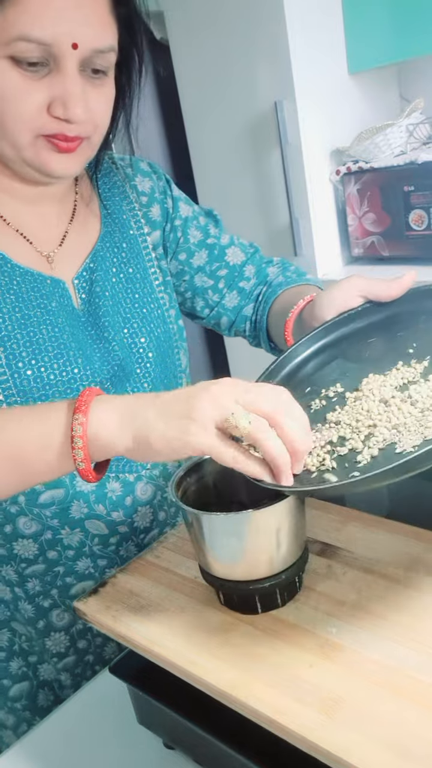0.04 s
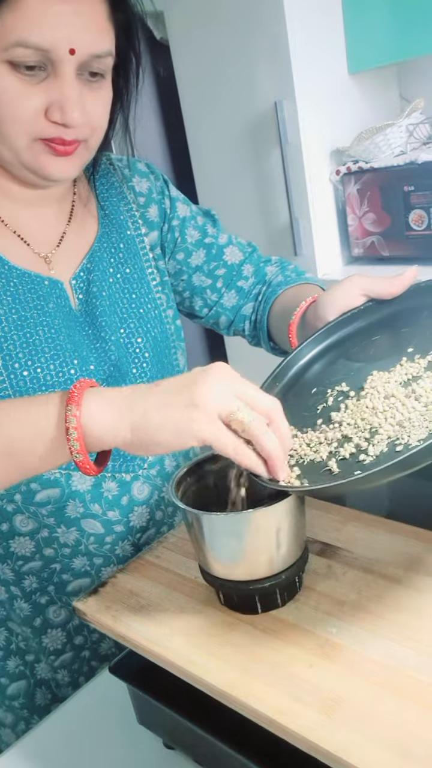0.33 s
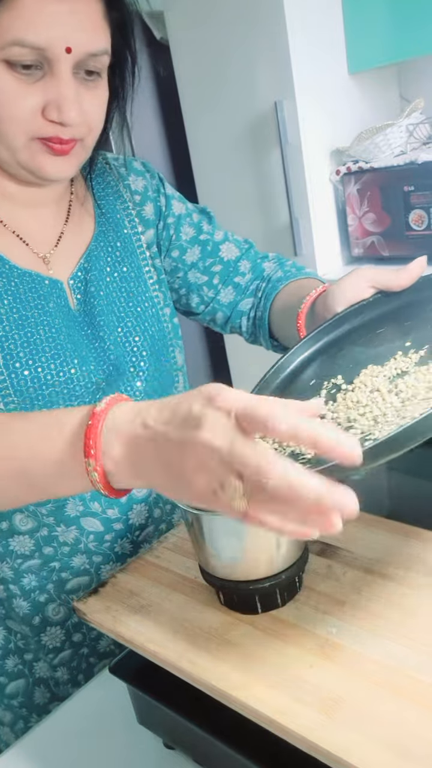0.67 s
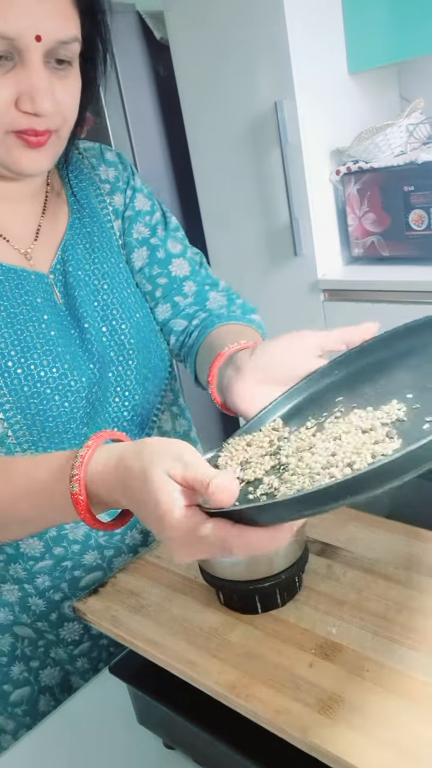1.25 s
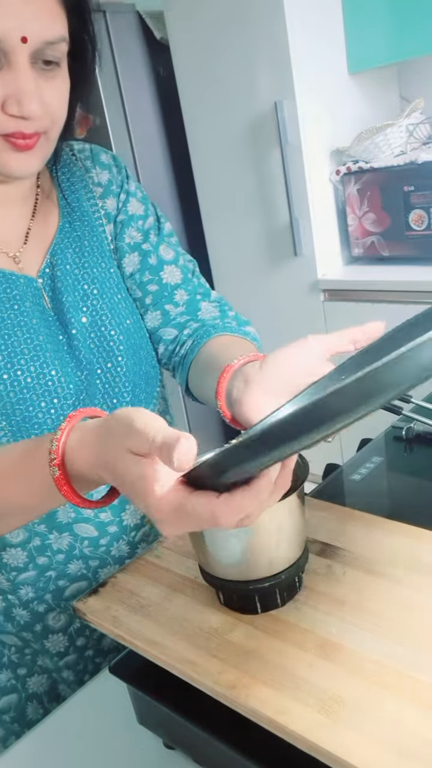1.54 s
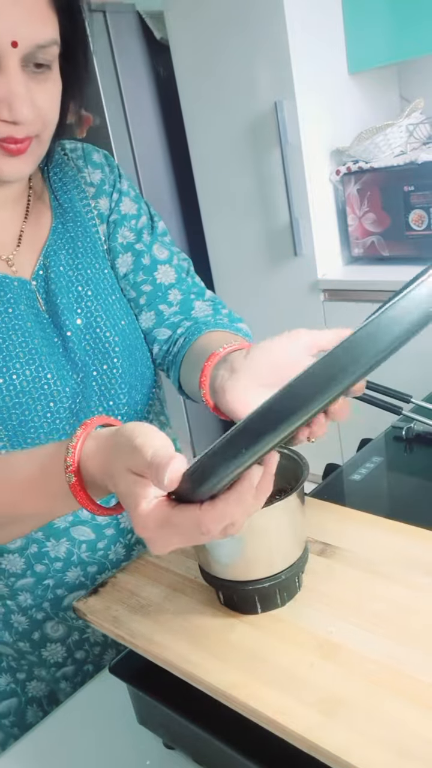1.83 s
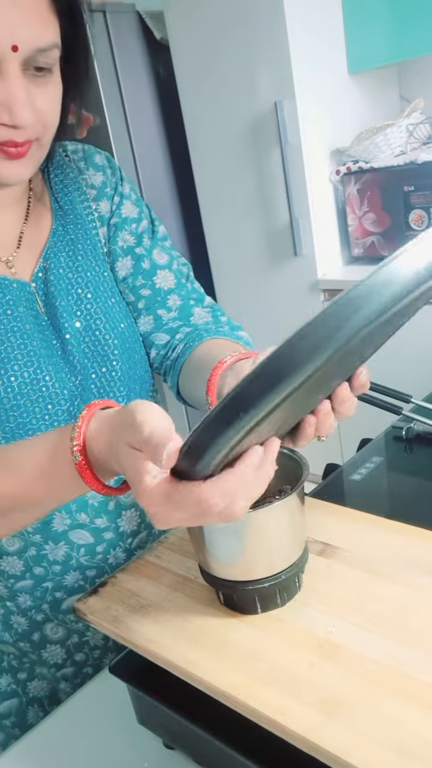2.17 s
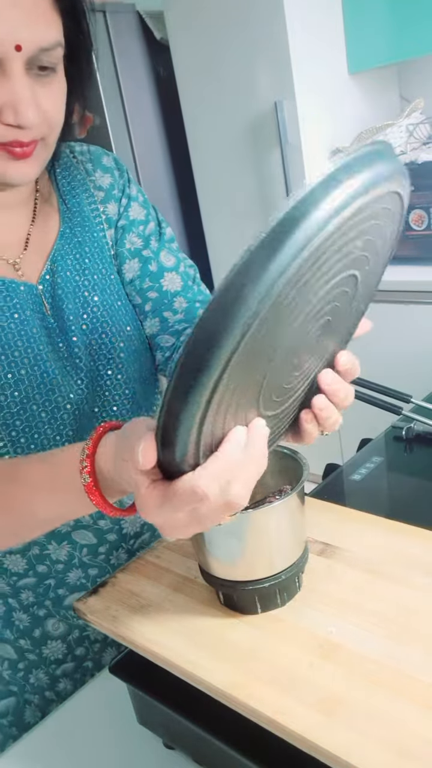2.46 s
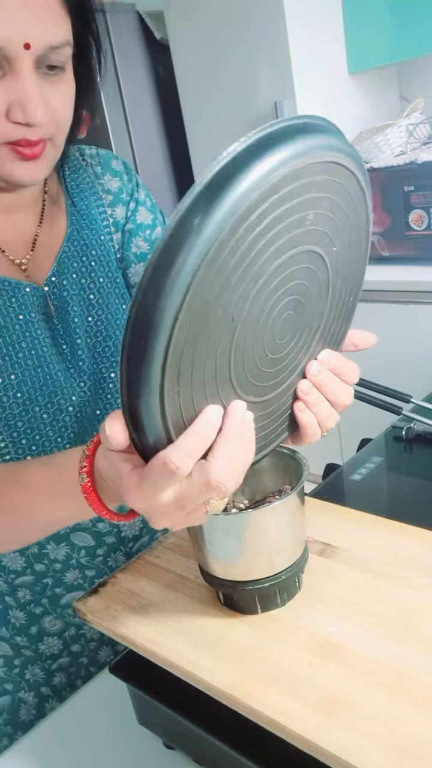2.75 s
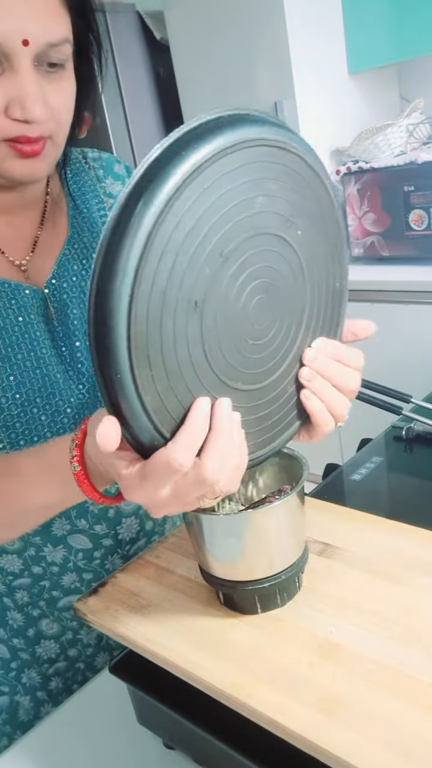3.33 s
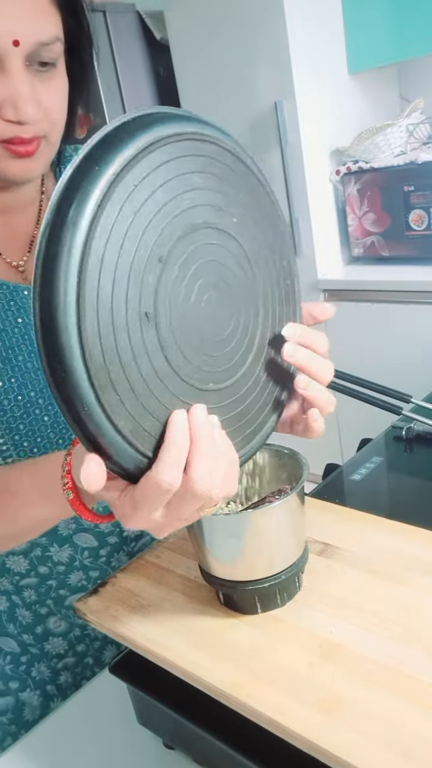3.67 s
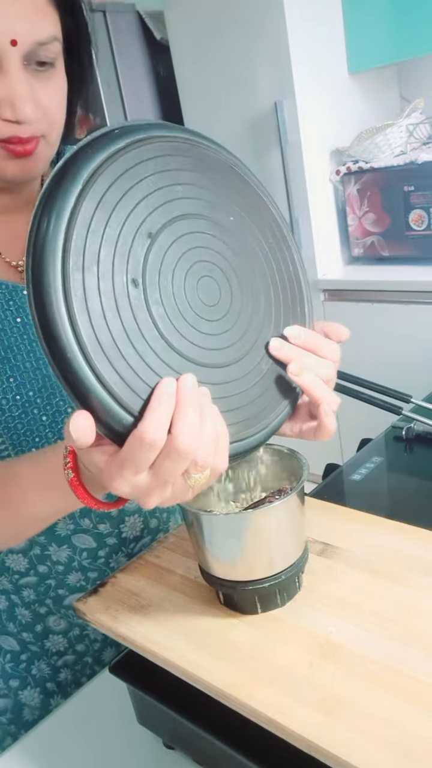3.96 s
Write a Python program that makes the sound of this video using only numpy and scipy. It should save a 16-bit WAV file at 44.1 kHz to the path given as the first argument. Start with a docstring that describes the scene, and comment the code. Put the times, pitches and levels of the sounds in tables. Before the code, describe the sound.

Dry seeds pour off a flat pan, rustling and pinging into a small metal jar.

```python
"""Dry seeds go from a flat pan into a steel mixer jar in a kitchen, over a low room rumble.
First they are brushed in: they patter on the heap and ring the jar's wall as a hand rubs the pan's rim.
Then they slide over the pan with a fine hiss, and a hum swells while the pan is tilted.
From 2.5 seconds on they are tipped in, and more single seeds ping on the steel and tick on the pan."""
import sys
import numpy as np
from scipy import signal
from scipy.fft import rfft, irfft
from scipy.io import wavfile
from scipy.ndimage import uniform_filter1d

SR = 44100
rng = np.random.default_rng(int(sys.argv[2]) if len(sys.argv) > 2 else 0)


def store_pcm(level_fs):
    """Save levels as 16-bit WAV."""
    pcm = np.round(np.clip(level_fs, -1, 1) * 32767).astype(np.int16)
    wavfile.write(sys.argv[1], SR, np.atleast_2d(pcm).T)


N = 176400  # 4 seconds
T = np.arange(N) / SR


def pours():
    """Falling seeds patter on the heap; some ring the jar's wall."""
    # The two pours. Each row: time in seconds, relative level in dB, wall compared with heap in dB.
    brushed = [(0.0, -89, -8.5), (0.144, -50, -16.5), (0.202, -60.5, -13), (0.224, -57, -14),
               (0.238, -58, -18), (0.29, -59, 2), (0.358, -45, -8), (0.394, -46, -14), (0.44, -38, -18),
               (0.79, -76, -10), (0.8, -64, -8.5)]
    tipped = [(2.5, -81, -3), (2.57, -88, -3), (2.586, -54.5, 5), (2.658, -47.5, 4), (2.67, -46, -6),
              (2.7, -46.5, 3), (2.804, -38.5, 1.5), (2.888, -43, 9.5), (2.912, -40, 1.5), (3.276, -49, -1),
              (3.456, -49, 0), (3.464, -44.5, -15.5), (3.526, -52, 6), (3.628, -46, 1), (3.81, -58.5, -1),
              (3.912, -44.5, 6), (4.0, -52.5, -3)]
    # The tone of the heap. Each row: frequency in Hz, relative level in dB.
    heap_tone = [(200, -23), (720, -16.5), (900, -6), (1060, -4), (1250, -15), (1850, -9), (2400, -3.5),
                 (2800, 0), (3250, -4.5), (3650, 0), (4500, -3.5), (5600, -5), (7600, -13.5), (8700, -14.5),
                 (10500, -16), (12500, -6), (16000, -9.5)]
    heap_flow, wall_flow = np.zeros((2, N))
    for pour in (brushed, tipped):
        level_db, wall_db = curves(pour)
        pouring = (T >= pour[0][0]) & (T <= pour[-1][0] + .03)
        flow = amp(level_db) * pouring
        heap_flow += flow
        wall_flow += flow * amp(wall_db)
    patter = shower(heap_flow, seed_click, peak_per_s=1300, spread_db=2.5)
    ringing = shower(wall_flow, wall_strike, peak_per_s=350, spread_db=3.5, variants=12)
    return amp(5.5) * colour(patter, heap_tone) + amp(-.5) * ringing


def shower(level, strike, peak_per_s, spread_db, variants=16):
    """Seeds land at random with uneven force; a weak flow breaks up into single grains."""
    force = amp(spread_db * np.minimum(rng.exponential(1, N), 4))
    chance = peak_per_s / SR * np.maximum(level / level.max(), .01) ** .6
    lands = rng.random(N) < chance
    hits = level * unit_level(force) * lands / np.sqrt(chance)  # fewer hits, same average power
    variant = rng.integers(0, variants, N)
    return sum(convolve(hits * (variant == k), strike()) for k in range(variants))


def seed_click(decay_s=.00035, size=400):
    """One seed hits: a tiny crack of noise, partly alike in both ears."""
    crack = rng.standard_normal((2, size)) * np.exp(-np.arange(size) / SR / decay_s)
    return unit_energy(flatten(stereo(crack, likeness=.5), smooth_bins=1200))


def wall_strike(tilt_db=0, size=12000):
    """A seed on steel: a click, a short dense ring and the jar's own notes, mixed anew each time."""
    # The tone of the steel wall. Each row: frequency in Hz, relative level in dB.
    wall_tone = [(1000, -37), (3500, -29.5), (5600, 0.5), (6500, 7), (7700, 3), (8700, -7.5), (9600, 3),
                 (11000, 0.5), (12500, 6.5), (16000, -11)]
    # The notes the jar rings at. Each row: frequency in Hz, relative level in dB.
    jar_notes = [(2961, -60), (3720, -57), (3828, -59), (5717, -59), (6320, -56), (6508, -56), (6982, -56),
                 (7381, -59), (7677, -61), (9399, -62), (10034, -58), (11100, -58), (11908, -58),
                 (12247, -59)]
    t = np.arange(size) / SR
    ring = unit_energy(flatten(rng.standard_normal((2, size)) * fade(t, t60_s=.078)))
    add(ring, 0, amp(-6) * seed_click())
    notes = np.zeros((2, size))
    for hz, db in jar_notes:
        t60_s = .38 / (1 + (hz / 10500) ** 4)  # high notes die sooner
        level_db = db + tilt_db * np.log2(hz) + 4 * rng.standard_normal()
        note = np.sin(2 * np.pi * (hz * t + rng.random((2, 1))))
        notes += amp(level_db) * fade(t, t60_s) * note
    return unit_energy(colour(ring, wall_tone, tilt_db)[:, :size] + amp(-5) * unit_energy(notes))


def single_hits():
    """Single seeds ping on the jar; seeds and fingers tick dryly on the pan."""
    # Pings and ticks. Each row: start in seconds, relative level in dB, brightness in dB per octave.
    pings = [(0.485, -39, 10), (.519, -36, 8), (.598, -45.5, 6), (.656, -41.5, 4.5), (1.72, -49.5, -6),
             (1.92, -46.5, 1), (1.957, -49.5, 4), (2.082, -51, 1), (2.125, -46, 8), (2.22, -49.5, 6),
             (2.612, -47, 4.5), (2.714, -32.5, 5.5), (2.722, -34, 0), (2.824, -37.5, -11), (2.838, -32, -4),
             (2.897, -36, 17), (3.084, -37.5, 3), (3.134, -30.5, 4.5), (3.158, -37, 3), (3.255, -40, 16),
             (3.266, -37, 8), (3.354, -42.5, 0.5), (3.636, -34, 6), (3.646, -45, 16), (3.684, -55, 13),
             (3.724, -39, 15), (3.732, -36, 15), (3.794, -41.5, 5), (3.905, -39, 22), (3.925, -33, 11),
             (3.944, -46, -1), (3.978, -40, 5)]
    ticks = [(0.222, -35.5, -5.5), (0.441, -33, -10), (.888, -55.5, 4), (1.003, -43, 5.5), (1.036, -47, 5),
             (2.124, -46.5, 2), (2.193, -42, -2), (2.304, -43.5, 2.5), (2.312, -54, 1),
             (2.392, -41.5, -4.5), (2.427, -45, -5), (2.4849, -40.5, 6), (2.54, -47, 9), (2.584, -38, 3.5),
             (2.646, -37, 3), (2.669, -29.5, -5.5), (2.68, -30, -8.5), (2.756, -32, -1), (2.784, -41, 10),
             (2.804, -27, 0.5), (2.962, -26, 14), (3.2, -37.5, -17), (3.303, -33.5, 3.5),
             (3.416, -43.5, -13), (3.463, -38.5, -13.5)]
    # The tone of a tick. Each row: frequency in Hz, relative level in dB.
    tick_tone = [(300, -45), (1000, -14.5), (1450, -46), (1900, -15), (2400, -1.5), (3000, -0.5), (3700, 0),
                 (4500, -3), (5600, -5.5), (7600, -7.5), (8700, -15), (10500, -9), (12500, -9.5),
                 (16000, -15.5)]
    hits = np.zeros((2, N))
    for start_s, db, tilt_db in pings:
        add(hits, start_s, amp(db + 29.5) * wall_strike(tilt_db))
    for start_s, db, tilt_db in ticks:
        tick = colour(seed_click(decay_s=.0003), tick_tone, tilt_db)
        add(hits, start_s, amp(db + 21) * unit_energy(tick))
    return hits


def slide():
    """Seeds skid over the pan in so many tiny clicks that they blur into a hiss."""
    # The strength of the sliding. Each row: time in seconds, relative level in dB.
    slide_levels = [(0, -68.5), (.05, -56), (.13, -57), (.28, -57), (.34, -47), (.5, -45.5), (.62, -58),
                    (.78, -69.5), (.87, -54.5), (.96, -63.5), (1.01, -60.5), (1.07, -60), (1.2, -54.5),
                    (1.3, -57), (1.38, -54), (1.53, -60.5), (1.66, -54.5), (1.74, -50.5), (1.86, -50),
                    (1.95, -58), (2.05, -60), (2.2, -60.5), (2.34, -68), (2.48, -65), (2.55, -56),
                    (2.7, -65)]
    # The tone of the pan. Each row: frequency in Hz, relative level in dB.
    pan_tone = [(300, -29), (1000, -3.5), (1700, -10.5), (2700, -2), (4200, -2.5), (5300, 0.5),
                (7600, -1.5), (8400, -10), (10000, -8), (11800, -2), (16000, -7)]
    level_db, = curves(slide_levels)
    clicks = shower(amp(level_db), seed_click, peak_per_s=3500, spread_db=2.5)
    return amp(5) * colour(clicks, pan_tone)


def hand_rub():
    """Hand and sleeve rub softly along the pan's rim as the grip changes."""
    # The strength of the rub. Each row: time in seconds, level in dB.
    rub_levels = [(0, -67), (.15, -53), (.3, -65), (.6, -53), (.8, -57.5), (1.0, -61), (1.35, -69),
                  (1.6, -87)]
    # The tone of the rub. Each row: frequency in Hz, relative level in dB.
    rub_tone = [(200, -11), (600, -8.5), (1000, 1.5), (1500, 0), (2500, -5), (3400, -28), (8000, -11),
                (16000, -20)]
    level_db, = curves(rub_levels)
    return amp(level_db) * colour(rng.standard_normal((2, N)), rub_tone)


def kitchen(sound, size=20000):
    """Quick echoes bounce off pan and board, then the room rings briefly."""
    t = np.arange(size) / SR
    early, late = rng.standard_normal((2, 2, size))
    early = unit_energy(early * np.exp(-t / .0048) * (t > .001))
    late = unit_energy(late * fade(t, t60_s=.21) * (t > .005))
    direct = t == 0
    return convolve(sound, unit_energy(flatten(direct + amp(-1) * early + amp(-6) * late)))


def place_right(sound, left_lag_s=.00038):
    """Sound from a little to the right reaches the left ear later."""
    # The balance between the ears. Each row: frequency in Hz, left minus right in dB.
    balance = [(300, 36), (700, -4), (1400, -0.5), (3000, -3.5), (6000, -5), (8000, -4.5), (10000, 2.5),
               (16000, -1.5)]
    hz = np.fft.rfftfreq(2 * N, 1 / SR)
    lean = amp(value_at(balance, hz) / 2)
    delay = np.exp(-2j * np.pi * hz * left_lag_s)
    ears = np.array([lean * delay, 1 / lean])
    return irfft(rfft(sound, 2 * N) * ears)[:, :N]


def hum():
    """A low tone creeps up in pitch and swells while the pan is tilted."""
    # The course of the hum. Each row: time in seconds, pitch in Hz, level in dB.
    course = [(0, 128.4, -59.5), (.75, 130, -56), (1.0, 130.8, -52), (1.5, 133.1, -51.5),
              (1.65, 133.5, -42.5), (1.85, 135, -45), (2.16, 137, -42.5), (2.3, 137, -71),
              (2.7, 138.4, -56.5), (2.85, 138.7, -46), (3.1, 138, -60.5), (4, 138, -56.5)]
    pitch_hz, level_db = curves(course)
    return amp(level_db) * unit_level(np.sin(2 * np.pi * np.cumsum(pitch_hz) / SR))


def rumble():
    """Low room noise, its bass nearly the same in both ears."""
    # The tone of the rumble. Each row: frequency in Hz, relative level in dB.
    rumble_tone = [(20, -16), (32, -20), (44, -1), (62, -2.5), (85, -1.5), (110, -2), (150, 0.5), (230, -1),
                   (330, -5), (450, -8), (640, -9.5), (800, -16.5), (1100, -17.5), (1400, -28.5),
                   (2500, -24), (8000, -40), (16000, -52)]
    # How alike the ears are. Each row: frequency in Hz, likeness from -1 (opposite) to 1 (the same).
    likeness = [(30, 0.9), (140, 0.94), (280, 0.86), (550, .6), (1200, 0), (16000, -0.7)]
    hz = np.fft.rfftfreq(N, 1 / SR)
    spectrum = stereo(rfft(rng.standard_normal((2, N))), value_at(likeness, hz))
    return amp(-47) * unit_level(irfft(spectrum * amp(value_at(rumble_tone, hz)), N))


def drones():
    """Narrow bands of room noise sound like wavering notes; the second swells and fades."""
    # The drones. Each row: centre in Hz, width to each side in Hz, base level in dB.
    bands = [(135, 17, -56.5), (165.35, 3.3, -56), (279.5, 12, -62), (613.6, 11.7, -62.5), (682, 9.6, -70),
             (928, 10, -73), (1099.4, 7.1, -72)]
    # The swell of the second drone. Each row: time in seconds, added level in dB.
    swell = [(0, 1), (1.4, 3), (2.2, 3.5), (2.55, -3.5), (2.8, 13), (3.0, 0), (3.25, 10.5), (3.55, -9),
             (3.9, 9.5), (4, 2.5)]
    hz = np.fft.rfftfreq(N, 1 / SR)
    voices = []
    for centre_hz, width_hz, db in bands:
        band = rfft(rng.standard_normal(N)) / (1 + ((hz - centre_hz) / width_hz) ** 2)
        voices.append(amp(db) * unit_level(irfft(band, N)))
    voices[1] *= amp(curves(swell)[0])
    return sum(voices)


def amp(db):
    """Turns decibels into a gain."""
    return 10 ** (np.asarray(db) / 20)


def fade(t, t60_s):
    """A gain that falls by 60 dB in t60_s seconds."""
    return amp(-60 * t / t60_s)


def unit_level(x):
    """Scales to an average power of one."""
    return x / np.sqrt(np.mean(x ** 2) + 1e-20)


def unit_energy(x):
    """Scales each channel to a total energy of one."""
    return x / np.sqrt(np.sum(x ** 2, -1, keepdims=True) + 1e-20)


def value_at(rows, hz):
    """Reads between the rows of a frequency table, with octaves evenly spaced."""
    row_hz, values = np.transpose(rows)
    return np.interp(np.log(hz + 1), np.log(row_hz), values)


def curves(rows):
    """Turns each column after the time into one value per sample."""
    times, *columns = np.transpose(rows)
    return [np.interp(T, times, column) for column in columns]


def stereo(noises, likeness):
    """Blends two unrelated noises into a left and right that are partly alike."""
    left, other = noises
    return np.array([left, likeness * left + np.sqrt(1 - likeness ** 2) * other])


def add(mix, start_s, sound):
    """Adds a stereo sound to the mix at the given time."""
    part = mix[:, round(start_s * SR):][:, :sound.shape[1]]
    part += sound[:, :part.shape[1]]


def convolve(x, response):
    """Lets every sample of x set off a copy of the response."""
    return signal.fftconvolve(np.atleast_2d(x), response, axes=1)[:, :N]


def colour(x, tone, tilt_db=0, size=2048):
    """Filters x with a tone table, tilted by tilt_db per octave above 2000 Hz."""
    hz = abs(np.fft.fftfreq(size, 1 / SR))
    octaves = np.log2(np.maximum(hz, 2000) / 2000)
    log_gain = np.log(amp(value_at(tone, hz) + tilt_db * octaves))
    spectrum = np.exp(np.conj(signal.hilbert(log_gain)))  # rings only after a hit, never before
    response = np.fft.ifft(spectrum).real[:size // 2]
    return convolve(x, unit_energy(response)[None])


def flatten(x, smooth_bins=200):
    """Evens out the broad tone of a random sound and keeps its fine ripple."""
    spectrum = rfft(x, 32768)
    broad_power = uniform_filter1d(abs(spectrum) ** 2, smooth_bins)
    return irfft(spectrum / np.sqrt(broad_power + 1e-12))[:, :x.shape[1]]


def scene():
    """The seeds in the kitchen, a little to the right, over the low background."""
    background = rumble() + drones() + hum()
    seeds = kitchen(single_hits() + pours() + slide() + hand_rub())
    return place_right(seeds) + background


def record(dry):
    """Cuts off the very highest treble."""
    cutoff_hz = 15750
    lowpass = signal.firwin(511, cutoff_hz, window=("kaiser", 9), fs=SR)
    return signal.oaconvolve(dry, lowpass[None], "same")


dry = scene()
out = record(dry)
store_pcm(out)
```